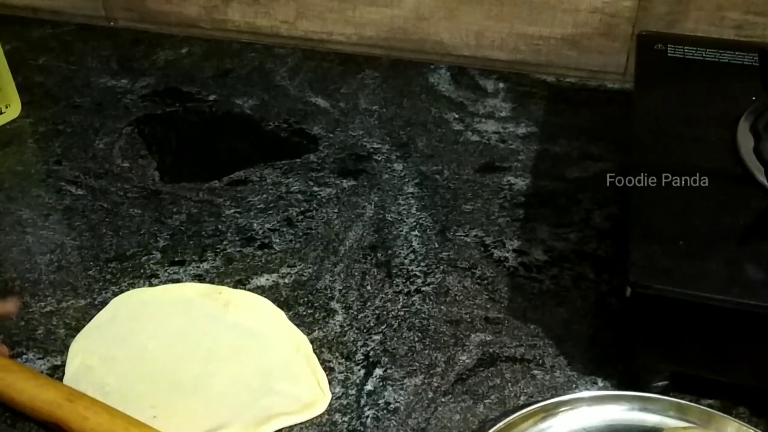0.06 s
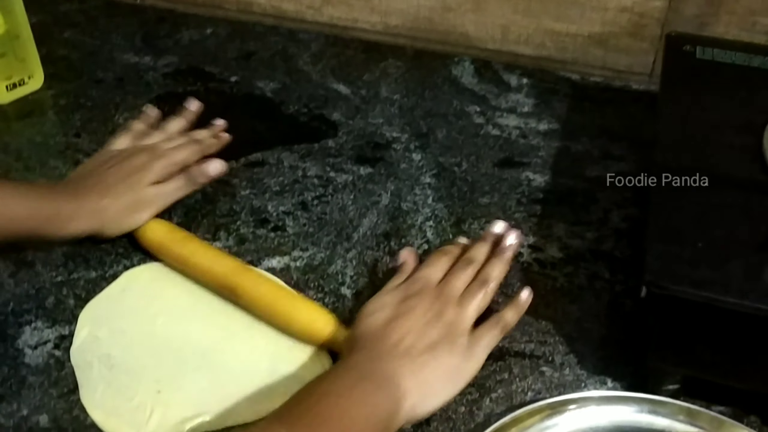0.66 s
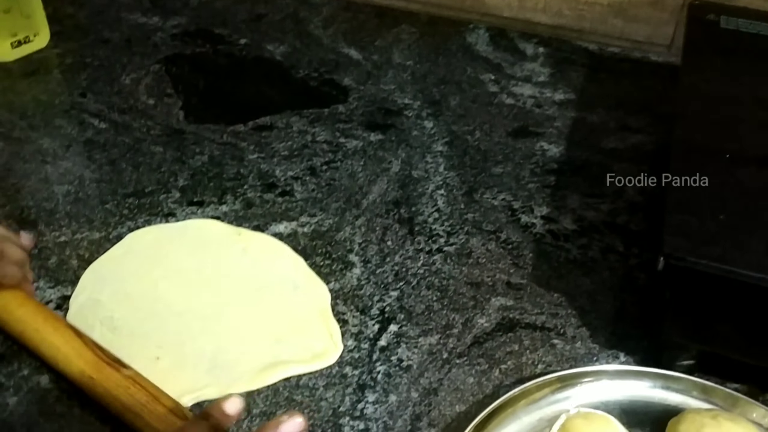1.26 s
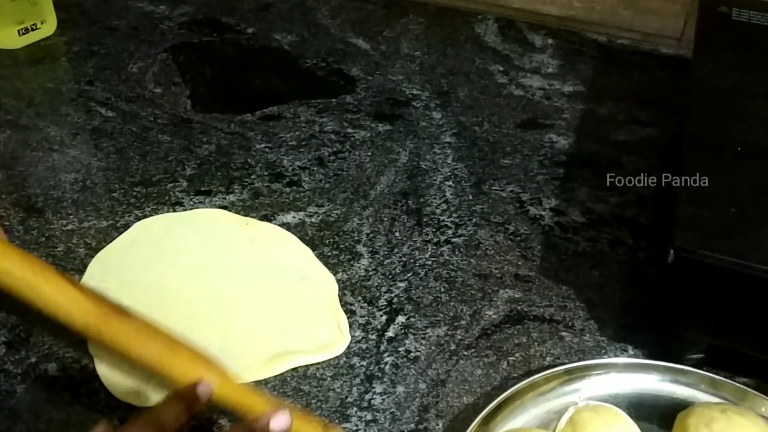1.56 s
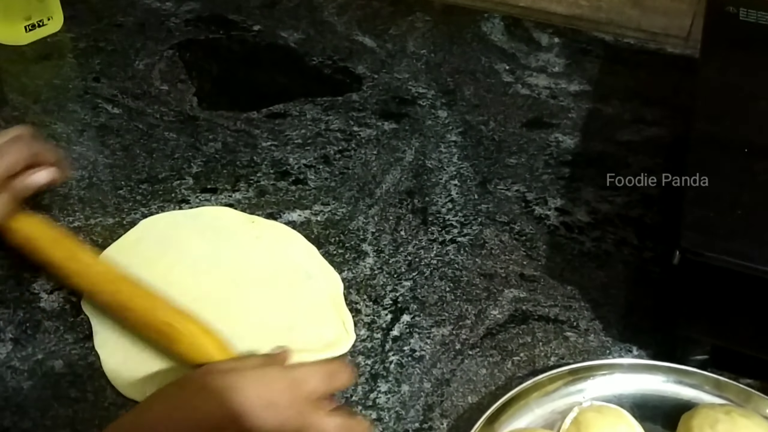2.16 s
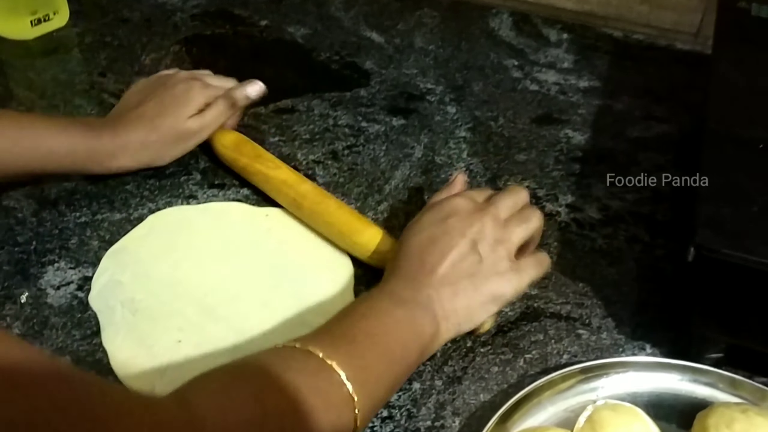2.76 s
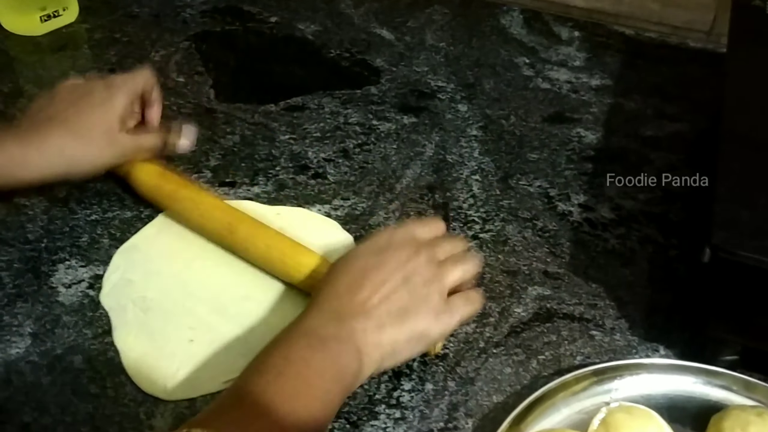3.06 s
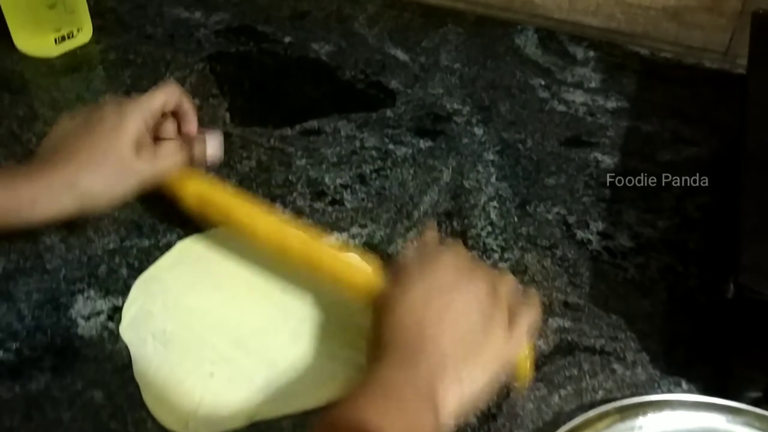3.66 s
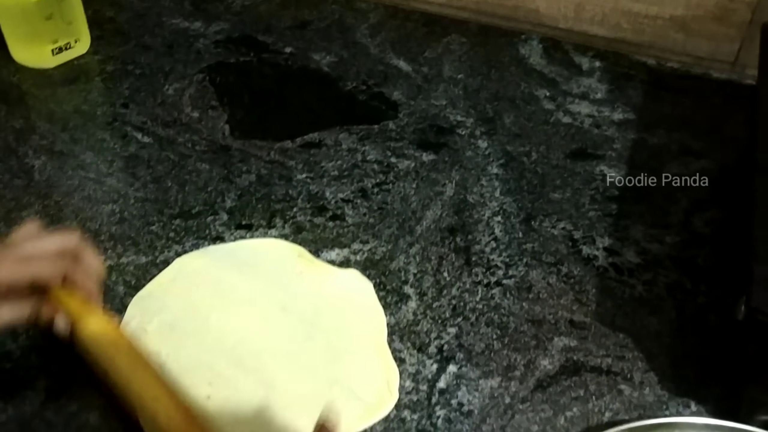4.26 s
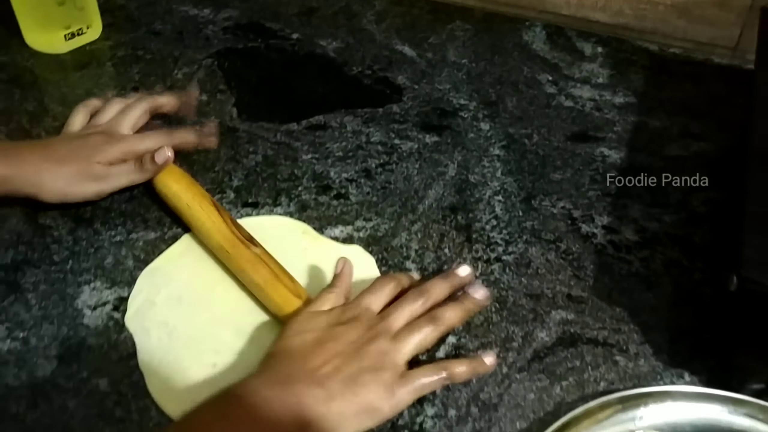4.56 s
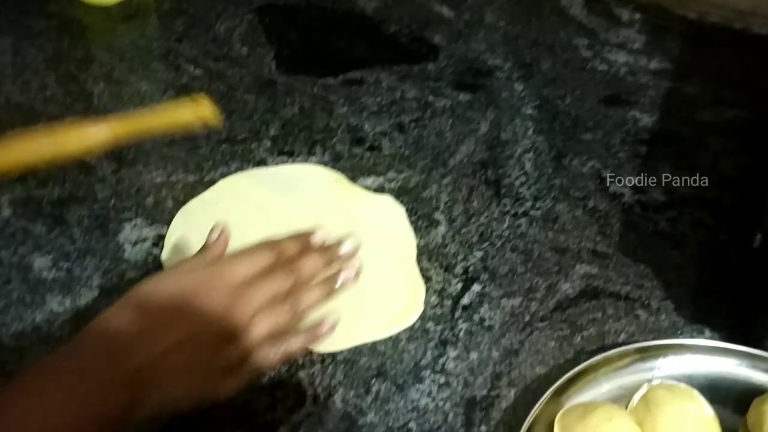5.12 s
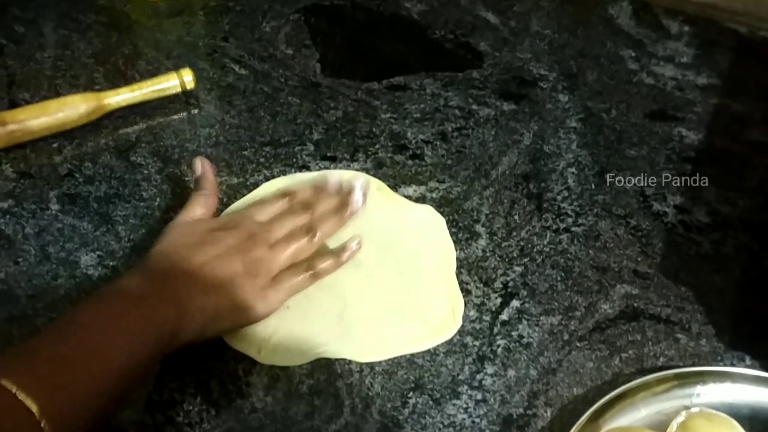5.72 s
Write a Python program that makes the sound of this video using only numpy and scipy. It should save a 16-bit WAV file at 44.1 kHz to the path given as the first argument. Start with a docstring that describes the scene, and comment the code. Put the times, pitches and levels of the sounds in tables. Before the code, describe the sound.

A wooden rolling pin rolls dough on a stone countertop, heard close and slightly to the right, in a bare, echoing kitchen with a faint, steady low drone. A light tap comes at about 0.2 seconds, followed by a soft thud and the faint rub of palms on wood. A few brighter clacks fall between 1.2 and 1.5 seconds. From about 2.3 to 3.4 seconds, dull thuds in the dough mix with small ringing taps and a soft low rumble from the counter as the pin rolls. Hard, sharp knocks land at 3.8 and 4.6 seconds, with lighter taps and more rolling around them. At about 5.3 seconds the pin is put down with another loud clack and rattles briefly until 5.5. A palm then gives the dough two light, smacking pats at about 5.7 and 5.9 seconds.

```python
"""A wooden rolling pin clacks on a stone countertop in a bare, ringing kitchen, over a low room drone.
The pin rings when the hands let it go; as it rolls, palms rub on the wood and the slab rumbles.
Dull low thuds come from the pin in the dough and under the hardest knock on the stone.
At the end the pin is put down and a palm pats the dough twice. A limiter ducks the hardest knocks."""
import sys
import numpy as np
from scipy import signal
from scipy.fft import rfft, irfft, next_fast_len
from scipy.io import wavfile
from scipy.ndimage import uniform_filter1d, minimum_filter1d

SR = 44100
rng = np.random.default_rng(int(sys.argv[2]) if len(sys.argv) > 2 else 0)


def to_wav(s):
    """Save 16-bit WAV."""
    ch = np.atleast_2d(s).T  # columns
    pcm = np.round(np.clip(ch, -1, 1) * 32767)  # PCM
    wavfile.write(sys.argv[1], SR, pcm.astype(np.int16))


N = 264026
TIME_S = np.arange(N) / SR
BLOW_S = TIME_S[:SR // 6]


def from_db(db):
    """Decibels to gain."""
    return 10 ** (np.asarray(db) / 20)


def at_hz(points, hz):
    """Table lookup on a log-frequency axis."""
    freqs, values = np.transpose(points)
    return np.interp(np.log(hz), np.log(freqs), values)


def band(x, low_hz, high_hz, order=2):
    """Butterworth band-pass."""
    edges_hz = [low_hz, min(high_hz, SR / 2 - 500)]
    return signal.sosfilt(signal.butter(order, edges_hz, "band", fs=SR, output="sos"), x)


def unit_blow(x):
    """Scale to the energy of 2 ms at full level."""
    return x * np.sqrt(.002 * SR / np.sum(x ** 2))


def pulse(low_hz, high_hz, order=2):
    """One contact: a band-limited click."""
    return unit_blow(band((BLOW_S == 0) + 1e-18, low_hz, high_hz, order=order))


def ring(modes, t):
    """Decaying sines from (f/Hz, level/dB, t60/s), signs alternating."""
    return sum((-1) ** k * from_db(db - 60 * t / t60_s) * np.sin(2 * np.pi * hz * t)
               for k, (hz, db, t60_s) in enumerate(modes))


def add(track, at_s, sound):
    """Mix a sound into a track."""
    start = max(0, round(at_s * SR))
    track[start:start + len(sound)] += sound[:N - start]


# reflections off counter and hands: delay/s, strength
NEAR_REFLECTIONS = [(.00016, 1), (.00037, 0.57), (.00083, .35)]
def smear(x):
    """Nearby surfaces spread a click over a few ms without colouring it (all-passes)."""
    for delay_s, strength in NEAR_REFLECTIONS:
        poles = np.r_[1, np.zeros(round(delay_s * SR)), np.clip(strength, 0, .8)]
        x = signal.lfilter(poles[::-1], poles, x)
    return x


# clack modes: f/clack pitch, level/dB, t60/s
CLACK_MODES = [(.74, -3, .008), (.92, -1, .008), (1.07, 0, .010), (1.26, -3, .009)]
def pin_clack(pitch_hz, spread=1.63, click_db=-5, skirt_db=-13):
    """Wood meets stone: a click around the pitch, a fixed-band skirt and short-lived modes."""
    click = from_db(click_db) * pulse(pitch_hz / spread, pitch_hz * spread, order=3)
    skirt = from_db(skirt_db) * pulse(1590, 4570, order=4)
    modes = [(ratio * pitch_hz, db, t60_s) for ratio, db, t60_s in CLACK_MODES]
    return smear(click + skirt) + unit_blow(band(ring(modes, BLOW_S), 1300, 4800, order=3))


# pin modes, many in pairs: f/Hz, relative level/dB, t60/s, bending plane (signed weight)
PIN_MODES = [(459, -28, 0.33, -1.2), (681, -16.5, 0.04, -0.97), (961, -19, 0.071, -1.64),
             (1701, -5, 0.057, -0.33), (1742, -6.5, 0.092, -0.86), (1823, -3.5, 0.021, 0.66),
             (3020, -8.5, 0.064, 0.047), (3105, -9.5, 0.053, 0.48), (3376, -12, 0.069, 1),
             (3671, 0, 0.014, -1.94), (5015, -1, 0.031, -2.1), (5165, -1.5, 0.037, 1),
             (6250, -1.5, 0.011, -0.067), (6900, 1, 0.023, 0.7), (8150, -6.5, 0.011, 0.14),
             (8880, -8, 0.021, .5), (10060, -6.5, 0.0072, 0.26), (12200, -14, 0.0086, 0.47),
             (13300, -11, 0.0068, 0.24)]
def pin_ring(lower_db, upper_db, grain_turn, split_hz=3650, detune=.002, scatter_db=3.5):
    """Wood is stiffer along one plane; the turn of the grain shares a blow between the two planes."""
    modes = []
    for hz, db, t60_s, plane in PIN_MODES:
        share_db = 20 * np.log10(max(1 + grain_turn * plane, .1))
        drive_db = lower_db if hz < split_hz else upper_db
        detuned_hz = hz * (1 + detune * rng.normal())
        modes.append((detuned_hz, db + drive_db + share_db + scatter_db * rng.normal(), t60_s))
    return band(ring(modes, BLOW_S), 855, SR / 2)


# pin on stone: t/s, clack/dB, pitch/Hz, ring/dB, hard edge/dB re clack, grain turn, rebound delay/s
KNOCKS = [(0.001, -33.5, 1830, -31.5, -31, -0.65, 0.0037), (0.177, -21, 3500, -24, -22, 0.53, 0),
          (1.2018, -18.5, 3220, -8, -19, 0.11, 0.003), (1.467, -12, 3460, -29.5, -11.5, 0.21, 0.016),
          (1.524, -15.5, 3210, -23, -18.5, 0.44, 0.028), (1.8865, -45, 1390, -45, -22, -0.25, 0.0018),
          (2.6489, -54, 1810, -40.5, -22, -1.285, 0), (2.724, -29.5, 2628, -13.5, -9.5, -0.41, 0),
          (2.8659, -19.5, 1960, -27.5, -22, -0.89, 0.006), (2.8783, -22, 2630, -32, -17.5, 0.72, 0.0037),
          (3.3700, -34.5, 1795, -24.5, -24, -0.52, 0.00036), (3.7781, 2, 2924, -19.5, -5.5, -0.97, 0),
          (4.1850, -21.5, 3060, -22.5, -18.5, 0.52, 0.007), (4.27, -13, 2297, -21, -28.5, 0.84, 0.0018),
          (4.5585, 1.5, 3157, -12.5, -5.5, -0.54, 0), (4.9454, -28, 3190, -31.5, -31, 0.39, 0.033),
          (5.2623, 2.5, 3800, -13.5, -9.5, 0.55, 0.018), (5.3259, -14, 3500, -12, -1.5, 0.71, 0.0061),
          (5.4460, -21, 3130, -16.5, -15, -0.22, 0.0032), (5.4660, -21.5, 3150, -14, -7, -0.21, .022),
          (5.5300, -37, 3040, -21.5, -18, -1.3, 0)]
def pin_touches(rebound_clack_db=-8.5, rebound_ring_db=-2):
    """Each knock, plus a weaker rebound where its delay exceeds 5 ms."""
    for at_s, db, hz, ring_db, hard_db, turn, rebound_s in KNOCKS:
        yield at_s, db, hz, ring_db, hard_db, turn
        if rebound_s > .005:
            yield at_s + rebound_s, db + rebound_clack_db, hz, ring_db + rebound_ring_db, hard_db, turn


def pin_knocks(tick_db=-16, slab_db=-24.5, slab_db_per_db=0.49):
    """Each touch clacks, rings the pin and thuds the slab; hard contacts reach the upper modes."""
    out = np.zeros(N)
    thud = pulse(137, 1730)
    tick = smear(pulse(6600, 11000, order=3))
    for at_s, db, hz, ring_db, hard_db, turn in pin_touches():
        contact = pin_clack(hz) + from_db(tick_db + hard_db / 2) * tick
        ringing = pin_ring(ring_db, db + hard_db, turn)
        slab = from_db(slab_db + slab_db_per_db * db) * thud
        add(out, at_s, from_db(db) * contact + ringing + slab)
    return out


# diffuse field: f/Hz, left-right correlation
STEREO_CORRELATION = [(60, 0.99), (300, 0.78), (700, 0.4), (1400, 0), (3000, 0), (15000, 0.022)]
def diffuse_bands(size):
    """Half-octave stereo noise, alike in the bass, unrelated in the treble: (centre/Hz, noise)."""
    edges_hz = 22 * 2 ** np.arange(0, 9.6, .5)
    white = rng.standard_normal((2, 2, size))
    for k, (low_hz, high_hz) in enumerate(zip(edges_hz, edges_hz[1:])):
        hz = np.sqrt(low_hz * high_hz)
        alike = at_hz(STEREO_CORRELATION, hz)
        mid, side = band(white[k % 2], low_hz, high_hz, order=3)
        yield hz, np.sqrt((1 + alike) / 2) * mid + np.sqrt((1 - alike) / 2) * side * [[1], [-1]]


def diffuse_noise(spectrum):
    """Steady stereo noise shaped by (f/Hz, level/dB); rms 1."""
    size = next_fast_len(N)
    hz = np.maximum(np.fft.rfftfreq(size, 1 / SR), 1)
    alike = at_hz(STEREO_CORRELATION, hz)
    mid, side = rfft(rng.standard_normal((2, size))) * from_db(at_hz(spectrum, hz))
    out = irfft(np.sqrt(1 + alike) * mid + np.sqrt(1 - alike) * side * [[1], [-1]], size)[:, :N]
    return out / np.sqrt(np.mean(out ** 2))


# standing waves: f/Hz, level/dB, t60/s
ROOM_MODES = [(232.2, -46, 0.64), (256.6, -54, 0.75), (325.4, -48.5, 0.89), (416.8, -44, 1),
              (467.4, -39.5, 0.5), (545.5, -43.5, 0.29), (933, -48.5, 0.23)]
# reverb colour: f/Hz, level/dB re direct
REVERB_SPECTRUM = [(100, -9.5), (250, 12.5), (450, 9.5), (800, 6.5), (1700, -1), (3200, -3), (5000, -5.5),
                   (8000, -3), (15000, -5.5)]
# reverb decay: f/Hz, t60/s
REVERB_T60 = [(100, 0.83), (300, 0.52), (600, 0.72), (1500, 0.78), (3500, 0.66), (6000, 0.58),
              (10000, 0.41), (15000, 0.31)]
def kitchen_reverb(x, early_db=-4, early_t60_s=0.28, build_s=0.00044, build_cycles=5):
    """Hard walls: standing waves, early reflections and a tail that builds slowest in the bass."""
    t = TIME_S[:SR]
    response = ring(ROOM_MODES, t)
    for hz, noise in diffuse_bands(len(t)):
        early = from_db(early_db - 60 * t / early_t60_s)
        tail = from_db(-60 * t / at_hz(REVERB_T60, hz))
        envelope = (early + tail) * (1 - np.exp(-t / (build_s + build_cycles / hz)))
        envelope /= np.sqrt(np.sum(envelope ** 2))
        response = response + from_db(at_hz(REVERB_SPECTRUM, hz)) * noise * envelope
    return signal.fftconvolve(x[None], response, axes=1)[:, :N]


# background: f/Hz, relative density/dB
DRONE_SPECTRUM = [(30, -27), (70, -19), (110, -19), (170, -10.5), (245, 4), (330, 0), (450, -5), (600, -14),
                  (1000, -16), (2000, -19.5), (4000, -24.5), (8000, -29.5), (15000, -51)]
def room_drone(level_db=-47):
    """Steady low noise, strongest near 245 Hz."""
    return from_db(level_db) * diffuse_noise(DRONE_SPECTRUM)


# counter modes: f/Hz, level/dB, t60/s
SLAB_MODES = [(100.4, -9.5, 0.17), (119.7, -5, 0.21), (177, -7, 0.087), (220.4, 2, 0.21), (265.5, 7, 0.13),
              (402, -11, 0.061)]
def slab_rumble():
    """Unevenness of the rolling pin shakes the counter's modes; rms 1."""
    shaking = diffuse_noise([(60, 0), (500, 0), (1000, -30)])
    out = signal.fftconvolve(shaking, ring(SLAB_MODES, BLOW_S)[None], axes=1)[:, :N]
    return out / np.sqrt(np.mean(out ** 2))


# palms sliding on the pin: f/Hz, relative density/dB
RUB_SPECTRUM = [(500, -5), (1500, -1), (3300, 6.5), (6000, -2.5), (10000, 6), (15000, 3)]
# strokes: t/s at full speed, length/s, rub/dB, rumble/dB
STROKES = [(0.01, 0.14, -51.5, -75), (0.56, 0.32, -48.5, -56.5), (0.898, 0.44, -48.5, -63),
           (1.147, 0.22, -57, -51), (2.45, 0.56, -52, -43.5), (3.2, 0.32, -54.5, -45.5),
           (4.076, 0.87, -51.5, -50.5), (4.82, 0.48, -51, -48.5)]
def rolling(speed_exponent=1.36, rest_rub_db=-57):
    """Rub and rumble swell with each stroke's speed; once the hands lean in, the slab keeps rumbling."""
    lean_at_s, lean_rise_s, lean_db = 0.906, .05, -53.5
    firmer_over_s, firmer_db = 1.2, 6
    leaning_s = TIME_S - lean_at_s
    effort_db = lean_db + firmer_db * np.clip(leaning_s / firmer_over_s, 0, 1)
    rumble_power = (from_db(effort_db) * np.clip(leaning_s / lean_rise_s, 0, 1)) ** 2
    rub_power = from_db(rest_rub_db) ** 2
    for at_s, length_s, rub_db, rumble_db in STROKES:
        speed = np.abs(np.cos(np.pi * np.clip((TIME_S - at_s) / length_s, -.5, .5)))
        swell = speed ** speed_exponent
        rub_power = rub_power + (from_db(rub_db) * swell) ** 2
        rumble_power = rumble_power + (from_db(rumble_db) * swell) ** 2
    return np.sqrt(rub_power) * diffuse_noise(RUB_SPECTRUM) + np.sqrt(rumble_power) * slab_rumble()


# dull low thuds: t/s, bump/dB, upper edge/Hz, tick/dB
DULL_THUDS = [(0.409, -30.5, 546, -38), (2.296, -27, 975, -30.5), (2.313, -24, 730, -59),
              (3.101, -51, 490, -35), (3.138, -25.5, 638, -32.5), (3.160, -30, 630, -60),
              (3.2993, -54, 630, -37), (3.781, -18.5, 625, -52)]
def dull_thuds(trim_db=-2):
    """Low bumps, each with a tick: the pin in the dough, and under the hardest knock on the stone."""
    out = np.zeros(N)
    tick = smear(smear(pulse(1120, 12300)))
    for at_s, bump_db, edge_hz, tick_db in DULL_THUDS:
        add(out, at_s, from_db(bump_db) * pulse(173, edge_hz, order=4) + from_db(tick_db) * tick)
    return from_db(trim_db) * out


# air cupped under the palm: f/Hz, level/dB, t60/s
CUPPED_AIR_MODES = [(1606, 4, 0.009), (2580, 16, 0.0012), (3500, 15, 0.0035)]
# palm on dough: t/s, smack/dB, cupped air/dB, thud/dB
PATS = [(5.6880, -17, -14, -41.5), (5.8650, -16, -34, -38)]
def palm_pats():
    """The palm closes on the dough within a few ms: bright smack, pop of trapped air, low thud."""
    out = np.zeros(N)
    smack = smear(smear(pulse(3540, 8100, order=1)))
    pop = smear(ring(CUPPED_AIR_MODES, BLOW_S))
    thud = pulse(85, 480)
    for at_s, smack_db, air_db, thud_db in PATS:
        add(out, at_s, from_db(smack_db) * smack + from_db(air_db) * pop + from_db(thud_db) * thud)
    return out


def scene(left_lag_s=.00008, left_blows_db=-10, left_bed_db=-6.5):
    """Blows and reverb over drone and rolling; the left microphone is farther from the pin."""
    blows = pin_knocks() + dull_thuds() + palm_pats()
    direct = np.array([np.interp(TIME_S - left_lag_s, TIME_S, blows), blows])
    drone = room_drone()
    blows_in_room = direct + kitchen_reverb(blows)
    bed = drone + rolling()
    return blows_in_room * from_db([[left_blows_db], [0]]) + bed * from_db([[left_bed_db], [0]])


def limiter(x, threshold_db=-6, release_db_per_s=105):
    """Ducks each channel when its 2 ms level passes the threshold; clips what still tops full scale."""
    level_db = 10 * np.log10(np.abs(uniform_filter1d(x ** 2, size=89, axis=1)) + 1e-12)
    over_db = np.maximum(level_db - threshold_db, 0)
    recovery_db = release_db_per_s * TIME_S
    cut_db = np.maximum.accumulate(over_db + recovery_db, axis=1) - recovery_db
    held_gain_db = minimum_filter1d(-cut_db, size=45, axis=1)
    gain_db = uniform_filter1d(held_gain_db, size=45, axis=1)
    return np.clip(x * from_db(gain_db), -1, 1)


def record(dry, low_hz=84, high_hz=15600):
    """Limiter, bass roll-off, steep top cut."""
    highpass = signal.butter(3, low_hz, "high", fs=SR, output="sos")
    lowpass = signal.ellip(10, .1, 80, high_hz, fs=SR, output="sos")
    return signal.sosfilt(lowpass, signal.sosfilt(highpass, limiter(dry)))


dry = scene()
out = record(dry)
to_wav(out)
```